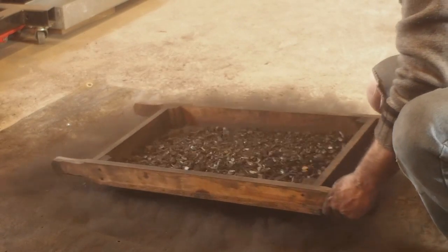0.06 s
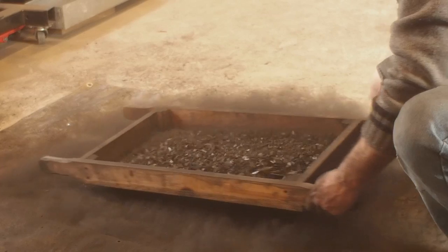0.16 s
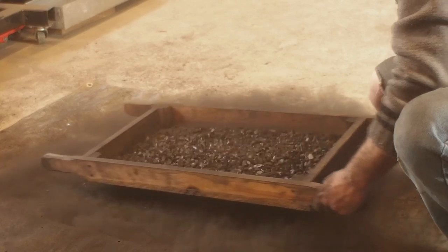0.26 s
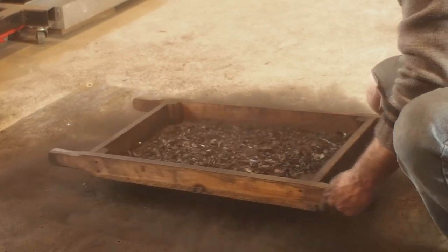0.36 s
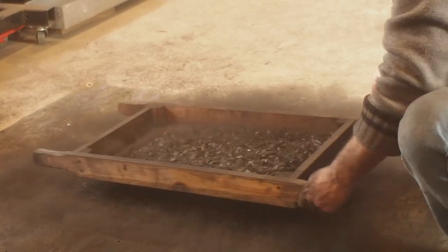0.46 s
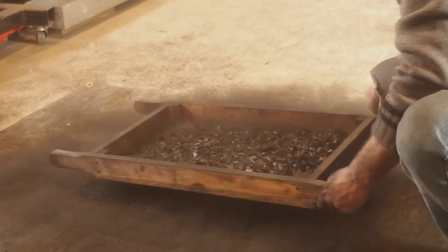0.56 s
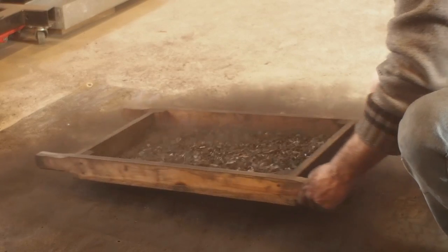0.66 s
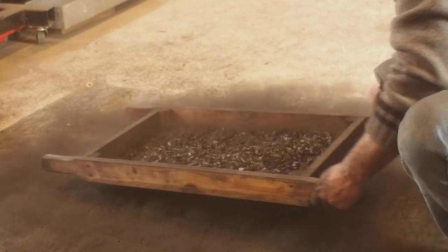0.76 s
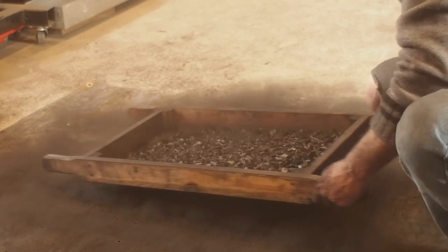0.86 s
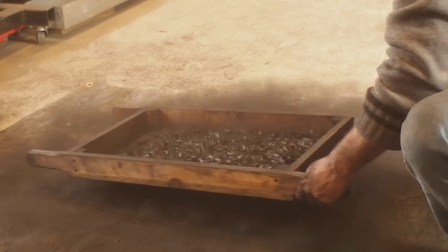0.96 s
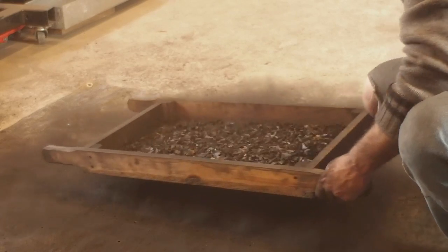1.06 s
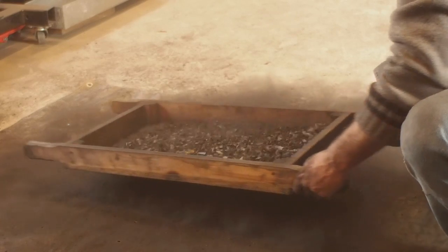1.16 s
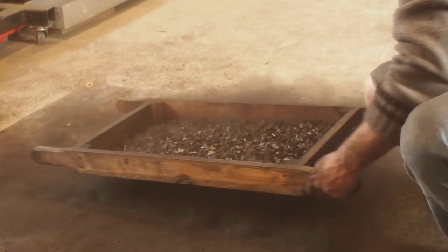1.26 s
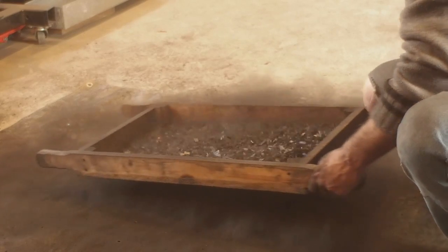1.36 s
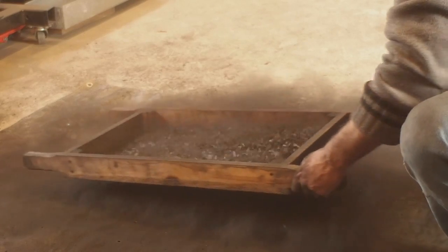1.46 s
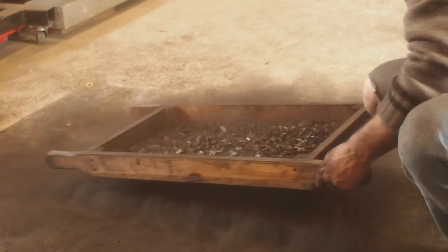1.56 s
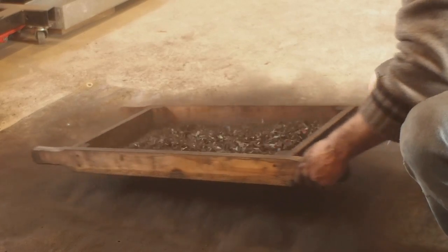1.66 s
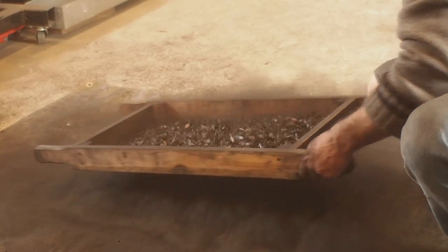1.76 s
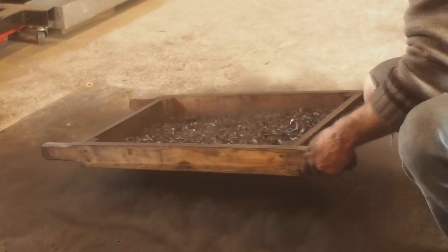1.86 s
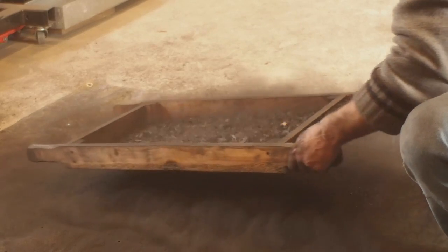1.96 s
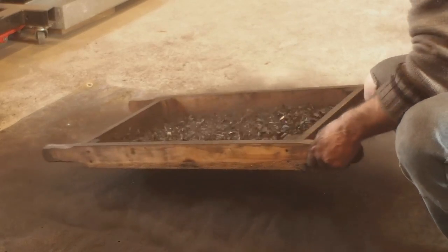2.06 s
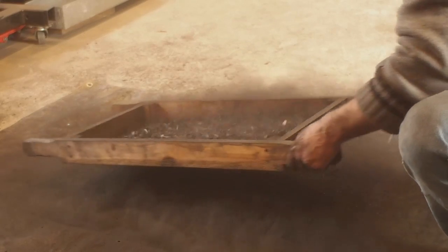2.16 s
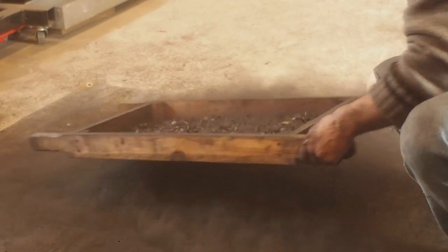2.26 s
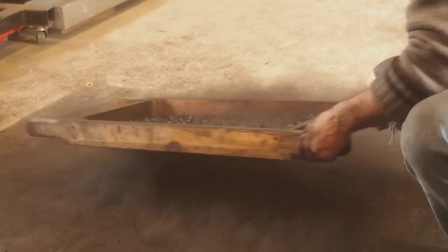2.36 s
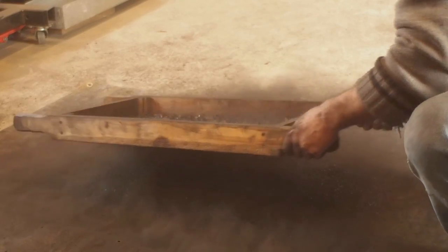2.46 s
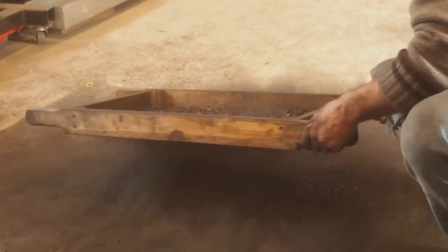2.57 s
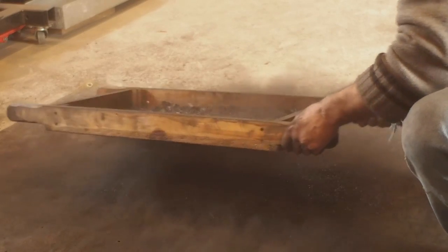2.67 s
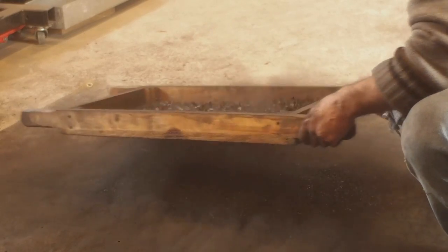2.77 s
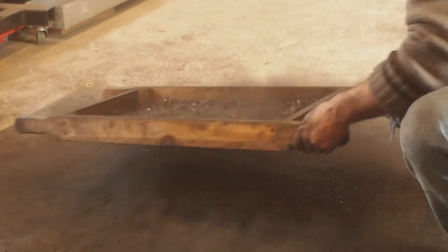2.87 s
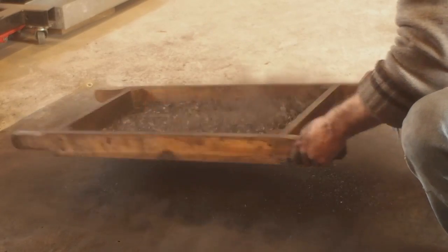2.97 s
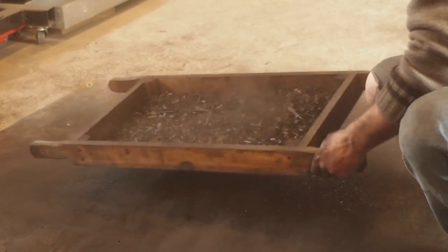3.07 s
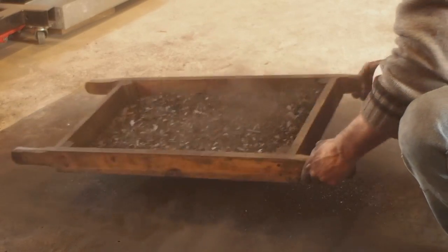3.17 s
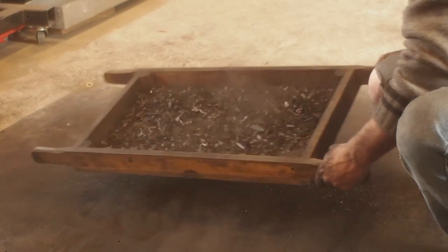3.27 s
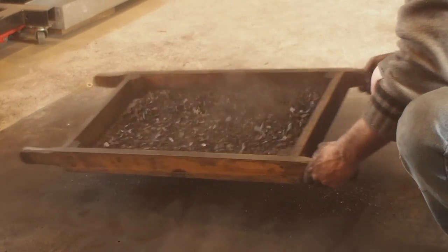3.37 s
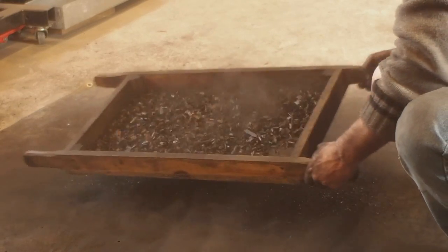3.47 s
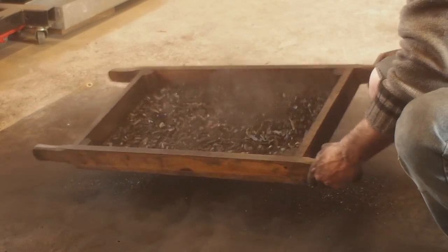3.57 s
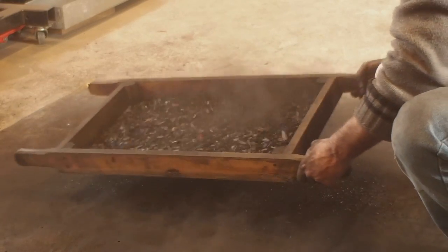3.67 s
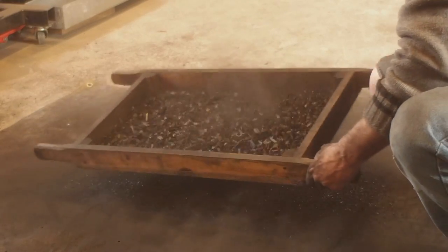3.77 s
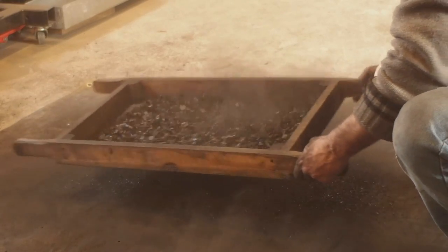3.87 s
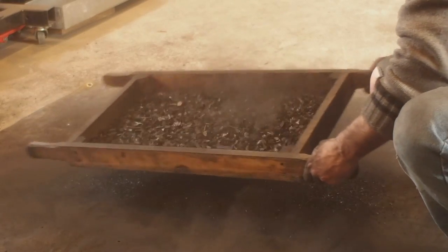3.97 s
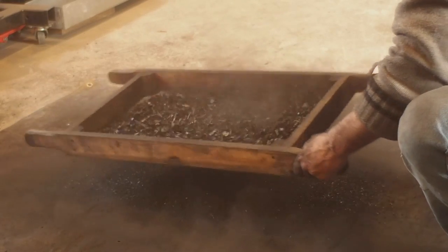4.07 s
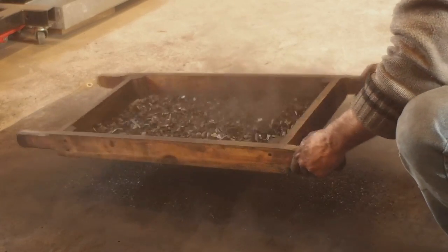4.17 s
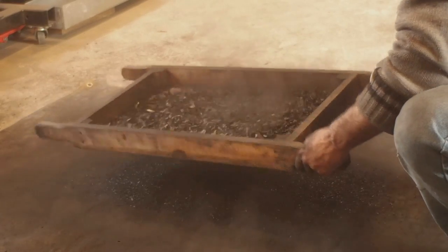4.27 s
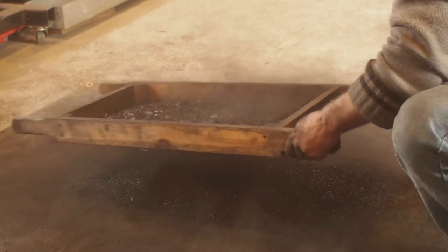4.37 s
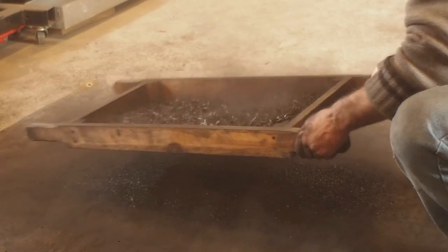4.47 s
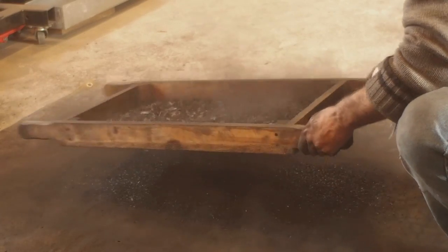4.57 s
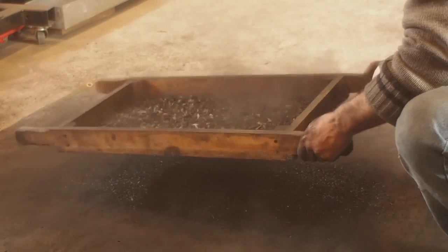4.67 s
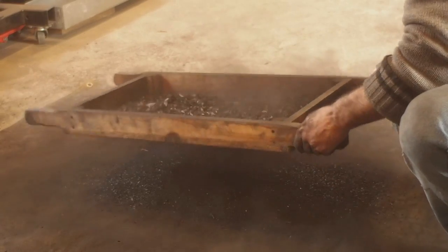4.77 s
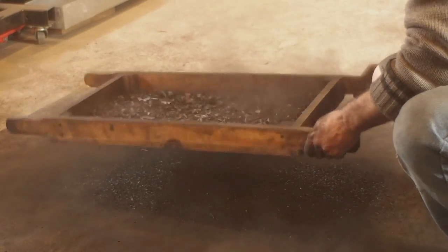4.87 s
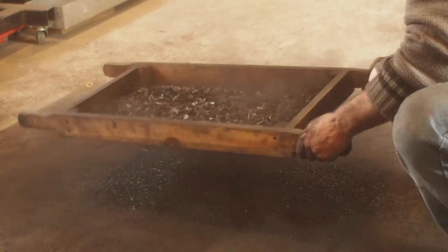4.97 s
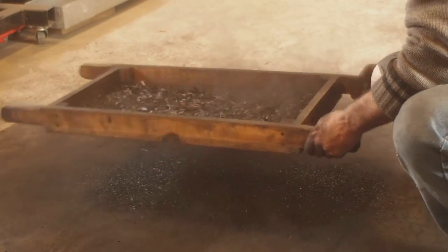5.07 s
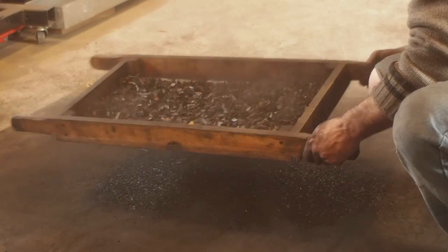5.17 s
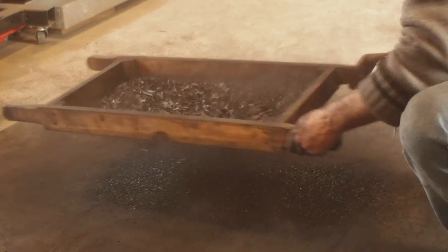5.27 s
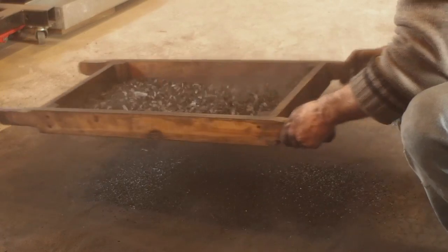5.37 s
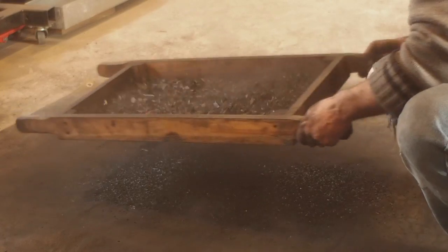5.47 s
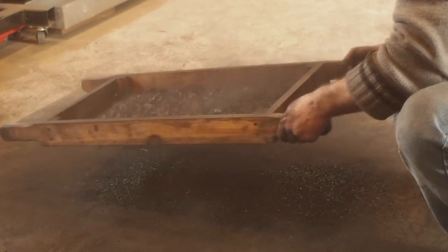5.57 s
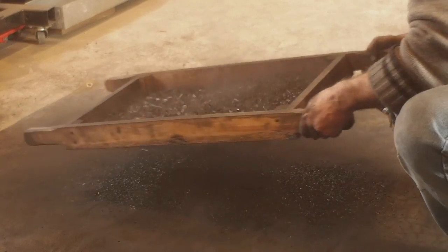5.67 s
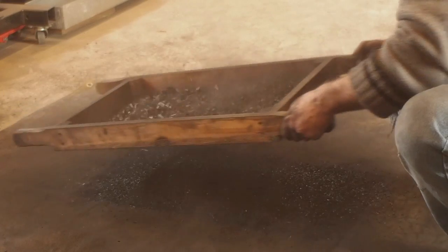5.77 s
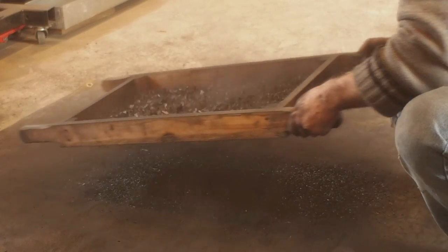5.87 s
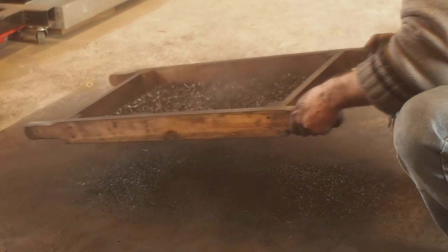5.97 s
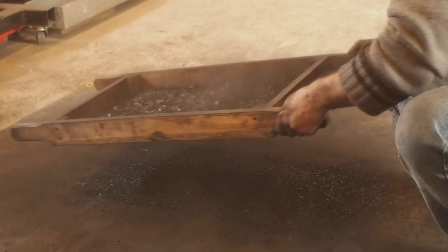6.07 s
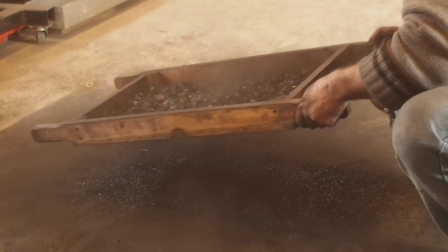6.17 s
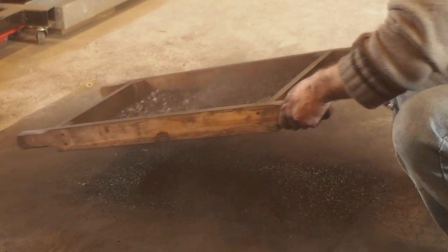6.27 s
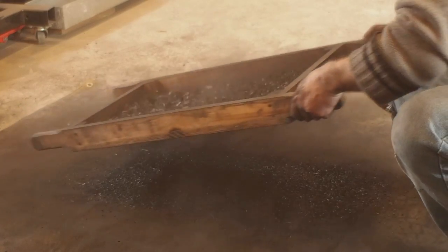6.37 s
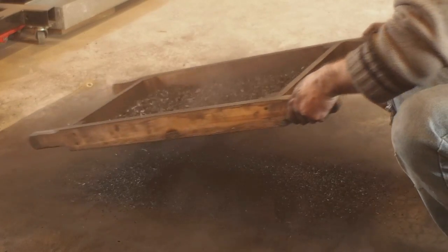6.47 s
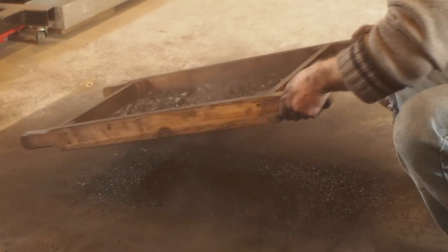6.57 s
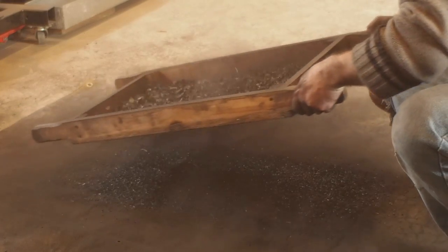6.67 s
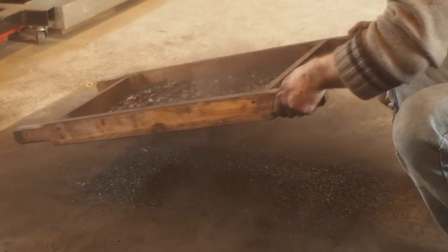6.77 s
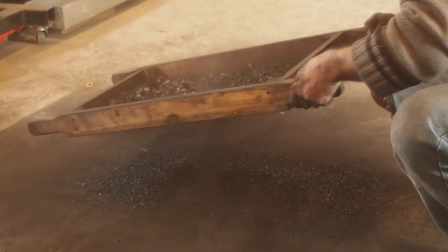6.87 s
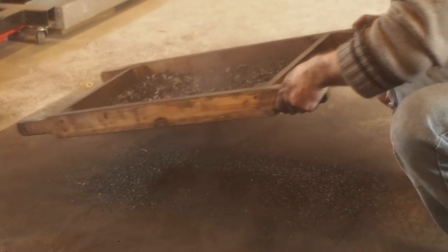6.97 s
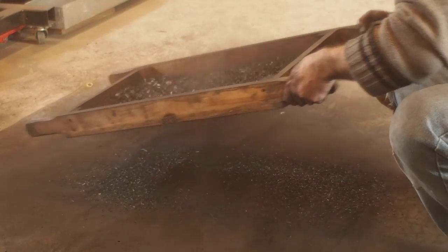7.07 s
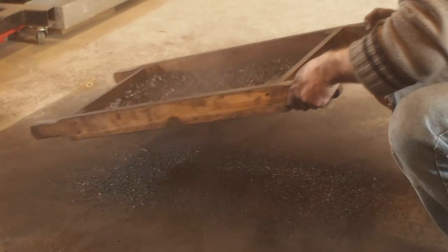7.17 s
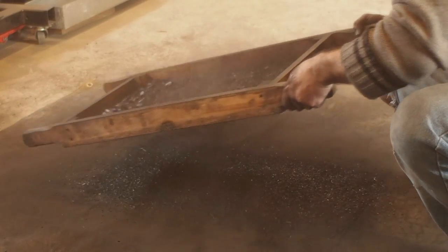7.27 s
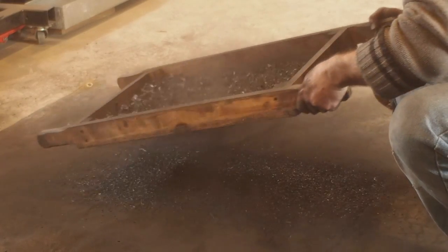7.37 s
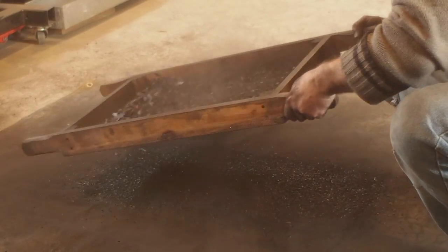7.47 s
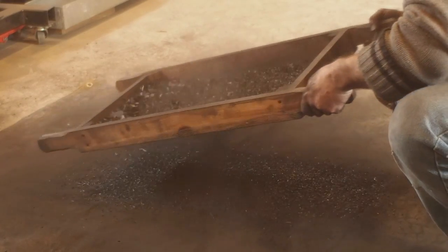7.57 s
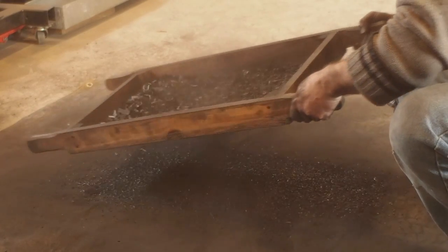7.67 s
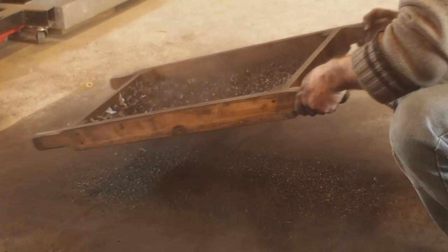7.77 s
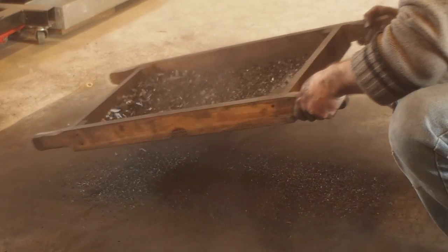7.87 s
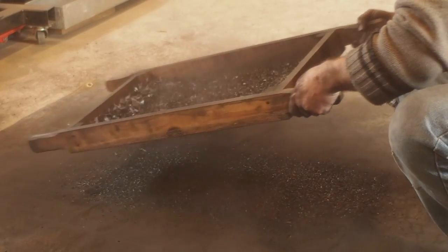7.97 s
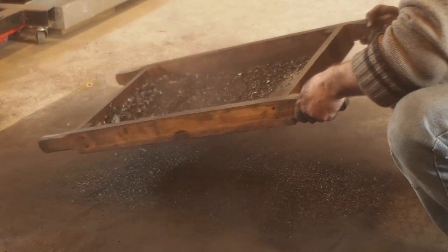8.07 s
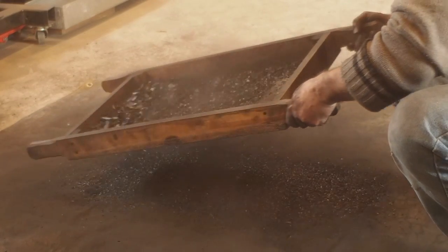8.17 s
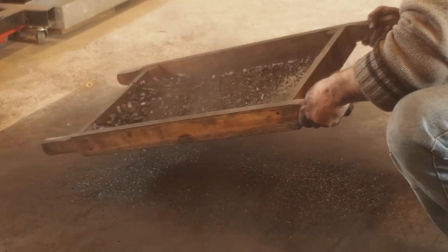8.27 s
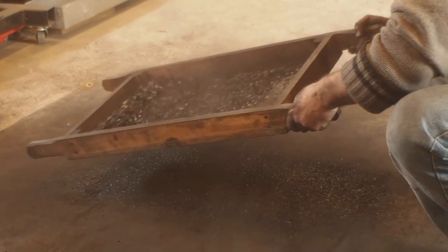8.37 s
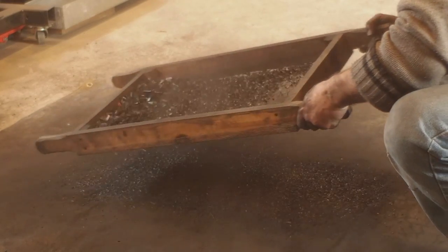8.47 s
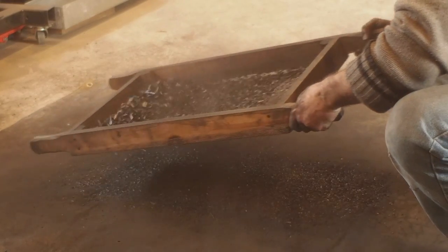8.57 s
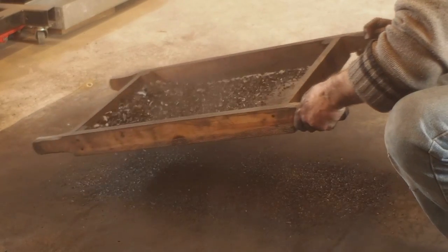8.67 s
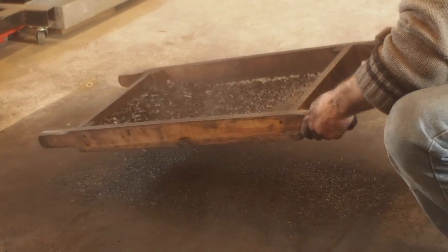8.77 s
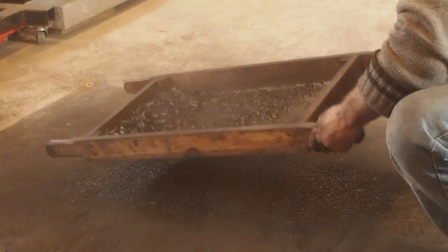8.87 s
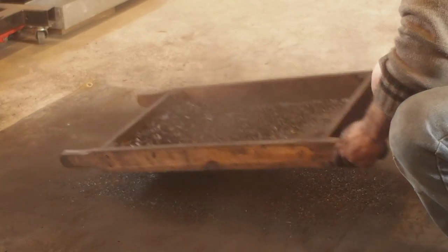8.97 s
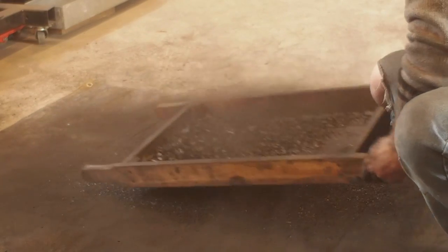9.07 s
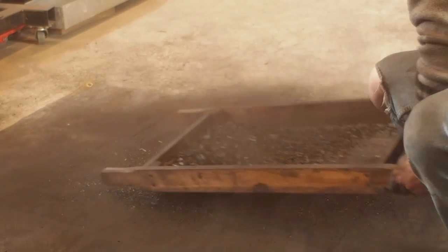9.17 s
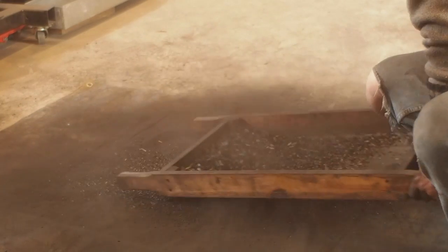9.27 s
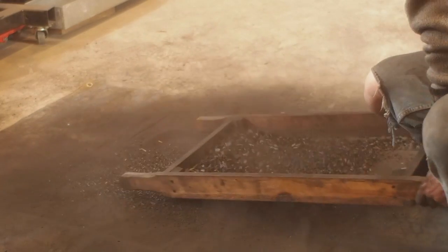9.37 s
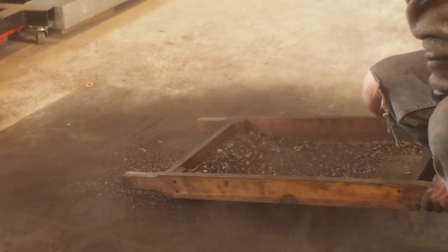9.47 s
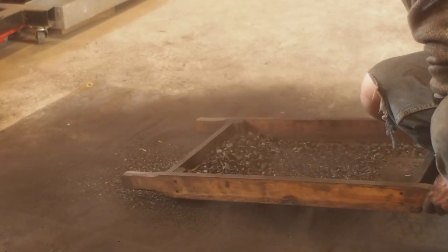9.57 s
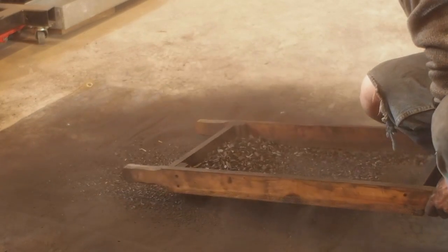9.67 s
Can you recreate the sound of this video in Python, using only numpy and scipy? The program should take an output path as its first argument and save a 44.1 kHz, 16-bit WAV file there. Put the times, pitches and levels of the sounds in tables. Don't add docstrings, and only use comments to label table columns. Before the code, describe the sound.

A steady, quick shuffle of dry charcoal in a sieve: swish, tiny pause, swish back, with crisp small clinks, snaps and a grainy hiss, plus woody frame rattle. The later strokes are uneven, strong on the return, and gradually weaken. Then it stops; sparse ticks, a light wooden set-down and a short gritty drag follow. Close microphone, slight diffuse shed echo, rather soft top treble, quiet machinery hum and distant rumble behind.

```python
import sys
import numpy as np
from scipy import signal
from scipy.fft import rfft, irfft, next_fast_len
from scipy.io import wavfile
from scipy.ndimage import uniform_filter1d

SR = 44100
rng = np.random.default_rng(int(sys.argv[2]) if len(sys.argv) > 2 else 0)


def to_wav(sig):
    pcm = np.clip(np.atleast_2d(sig), -1, 1) * 32767
    pcm = np.round(pcm).astype(np.int16)
    wavfile.write(sys.argv[1], SR, pcm.T)


def voltage_ratio(decibels):
    exponent = np.asarray(decibels, float) / 20
    return 10 ** exponent


N = 429093


def evened(x):
    return x / np.sqrt(np.mean(x ** 2) + 1e-20)


def read(points, hz):
    f, value = np.transpose(points)
    return np.interp(np.log(hz + 1), np.log(f + 1), value)


def curve(s, value):
    return uniform_filter1d(np.interp(np.arange(N) / SR, s, value), size=700)


def band(x, lo_hz, hi_hz):
    return signal.sosfilt(signal.butter(2, [lo_hz, hi_hz], "bandpass", fs=SR, output="sos"), x)


def level_in_band(x, level_db, ref_hz):
    return x / np.sqrt(np.mean((band(x, *ref_hz) / voltage_ratio(level_db)) ** 2))


def swells(rows, rise_db_per_s, fall_db_per_s):
    t = np.arange(0, N + 64, 64) / SR
    power = 0
    for s, db, hold in rows:
        early = np.maximum(s - t, 0)
        late = np.maximum(t - s - abs(hold), 0)
        power = power + voltage_ratio(2 * (db - rise_db_per_s * early - fall_db_per_s * late))
    return np.interp(np.arange(N) / SR, t, power)


def pair(shape, same):
    a, b, c, d = rng.standard_normal((shape[1], shape[0], 4)).T
    same, left = np.clip(same, -1, 1)[:, None], a + 1j * b
    right = same * left + np.sqrt(1 - same ** 2) * (c + 1j * d)
    return np.array([left, right]) / np.sqrt(2)


def clink(hz, cycles, lead_s=0., glide=0.):
    t = np.maximum(np.arange(1024) / SR - .0003 + np.array([[lead_s], [-lead_s]]) / 2, 0)
    turns = hz * t * (1 + glide * np.minimum(hz * t / cycles, 2))
    return np.sin(2 * np.pi * turns) * np.exp(-hz * t / cycles) * (1 - np.exp(-hz * t * 2))


def knocks(level_db, per_s, spread_db, share):
    busy = voltage_ratio(2 * share * (level_db - level_db.max()))
    hit = rng.random(N) < per_s * busy / SR
    size = voltage_ratio(spread_db * np.minimum(rng.exponential(1, N), 5)) * rng.choice([-1, 1], N)
    return hit * size * voltage_ratio(level_db) / np.sqrt(busy)


def pieces(level_db, lean, pitches, cycles, per_s, spread_db, share, wide_s, clump_db, ref_hz, count):
    hits, kind = knocks(level_db, per_s, spread_db, share), rng.integers(0, count, N)
    s, lean_points, slide_points = np.transpose(lean)
    lean_db = np.interp(np.arange(N) / SR, s, lean_points)
    slide = np.interp(np.arange(N) / SR, s, slide_points)
    clumps = rng.standard_normal((N // 512 + 1, count))
    clumps = evened(uniform_filter1d(uniform_filter1d(clumps, 6, axis=0), 5, axis=1))
    hits = hits * voltage_ratio(clump_db * clumps[np.arange(N) // 512, kind])
    middle_hz, out = np.sqrt(ref_hz[0] * ref_hz[1]), np.zeros((2, N))
    for k, hz in enumerate(np.geomspace(pitches[0][0], pitches[-1][0], count)):
        ring, glide = rng.standard_normal(2)
        place = 2 * (k * .618 % 1) - 1
        shape = clink(hz, cycles * np.exp(0.25 * ring), place * min(wide_s, 0.43 / hz), 0.031 * glide)
        gain = np.sqrt(hz) / np.linalg.norm(shape[0])
        at, these = np.flatnonzero((kind == k) & (hits != 0)), np.zeros(N)
        size_db = lean_db[at] * np.log2(hz / middle_hz)
        these[at] = hits[at] * voltage_ratio(size_db + read(pitches, hz / 2 ** slide[at]))
        out += signal.oaconvolve(these[None], gain * shape, axes=1)[:, :N]
    return level_in_band(out, level_db, ref_hz)


def ringing(level_db, modes, per_s, spread_db, ref_hz):
    t, out = np.arange(4096) / SR, np.zeros(N)
    for hz, width, db in modes:
        mode = voltage_ratio(db) * np.sqrt(width) * np.sin(2 * np.pi * hz * t) * np.exp(-np.pi * width * t)
        out += signal.oaconvolve(knocks(level_db, per_s, spread_db, .3), mode)[:N]
    return level_in_band(out, level_db, ref_hz)


def singles(rows, cycles, bounce_db, crack_db):
    out = np.zeros((2, N + SR))
    for s, db, hz in rows:
        for k, (late, tune, place) in enumerate(rng.random((4, 3))):
            at = round((s - .0003 + k * 0.0058 * (.5 + late)) * SR)
            pitch = hz * (1 + (k > 0) * (tune - .4))
            crack = clink(5200, 0.61)
            ring = clink(pitch, cycles, 4e-5 * (place - .5))
            out[:, at:at + 1024] += voltage_ratio(db + k * bounce_db) * (ring + voltage_ratio(crack_db) * crack)
    return out[:, :N]


# near_turn_s,
# pause_db, out_stroke_db, far_turn_s, back_stroke_db
SIEVE_STROKES = [(.05, 8, -43, .17, -42), (.3, 8, -40, .44, -41), (.55, 8, -41, .66, -39.5),
                 (.79, 8, -39.5, .91, -40), (1.04, 7.5, -39, 1.16, -38.5), (1.3, 8, -39, 1.42, -38.5),
                 (1.55, 8, -39.5, 1.68, -39), (1.81, 5.5, -41, 1.91, -38), (2.05, 4.5, -40.5, 2.16, -38),
                 (2.29, 6, -38.5, 2.41, -39), (2.53, 7, -38.5, 2.66, -40), (2.78, 7, -38.5, 2.9, -39),
                 (3.03, 4, -41, 3.14, -38), (3.27, 5.5, -39, 3.38, -38), (3.52, 3, -39, 3.62, -38),
                 (3.75, 5, -39.5, 3.86, -38), (3.99, 6, -38, 4.1, -38.5), (4.24, 8, -38, 4.36, -38),
                 (4.48, 6, -38.5, 4.62, -41), (4.71, 7, -39, 4.85, -41), (4.95, 5, -41, 5.08, -41),
                 (5.18, 5, -39, 5.3, -36), (5.43, 4, -37, 5.54, -36.5), (5.67, 5, -37.5, 5.77, -37),
                  (5.92, 5.5, -38, 6.01, -36.5), (6.16, 5.5, -39, 6.25, -37.5), (6.4, 4, -41, 6.5, -38),
                  (6.64, 4, -41, 6.73, -38), (6.88, 4, -41, 6.97, -38), (7.11, 5.5, -40, 7.2, -38),
                  (7.34, 5.5, -41, 7.43, -39), (7.58, 5, -43, 7.66, -39), (7.8, 5, -42, 7.89, -40),
                  (8.04, 3.5, -45.5, 8.12, -41), (8.25, 4, -43, 8.34, -42), (8.47, 4, -46, 8.56, -44)]
# start_s, fines_over_lumps_db, far_turn_pause_db
LOAD_BALANCE = [(0, 1.5, 4.5), (.6, 0, 2.5), (1.4, 1, 7), (2.6, -0.4, 2.5), (3.14, 2.5, 7.5), (3.5, 3, 3.5),
                (4.3, 0.8, 2.5), (5.05, 6, 5.5), (5.4, 3.5, 4), (6, 1.2, 5), (7, 0.53, 5), (8.7, 2.5, 8.5)]
# start_s, level_db, fines_over_lumps_db, hold_s
LOAD_SLIDES = [
    (8.713, -50, 3, 0.0072),
    (8.92, -62.5, 3, 0.053),
    (9.048, -68.5, 3, 0),
    (9.09, -63.5, -4, .015),
    (9.228, -55.5, -1.5, 0.018),
    (9.335, -50.5, 9.5, 0.038),
    (9.392, -57, -2.5, 0.17),
    (9.624, -64, -3, 0.073),
    (9.73, -59, 3.5, 0),
]


def shaking(fines):
    opening_db, stop_s, stop_db = -43, 8.68, -53
    out_peak, back_peak, lumps_lead = .57, 0.47, 0.07
    deep = (1.2, 0.84)[fines]
    back_lumps_db = 0.51
    side = fines - .5
    near, pause_db, out_db, far, back_db = np.transpose(SIEVE_STROKES)
    s, mix_db, far_pause_db = np.transpose(LOAD_BALANCE)
    before_db, next_near = np.append(opening_db, back_db[:-1]), np.append(near[1:], stop_s)
    out_s = near + (out_peak + side * lumps_lead) * (far - near)
    back_s = far + (back_peak + side * lumps_lead) * (next_near - far)
    near_db = (before_db + out_db) / 2 - deep * pause_db
    far_db = (out_db + back_db) / 2 - deep * np.interp(far, s, far_pause_db)
    times = np.ravel([near, out_s, far, back_s], "F")
    levels = np.ravel([near_db, out_db, far_db, back_db + (1 - fines) * back_lumps_db], "F")
    times = np.concatenate([[0], times, [stop_s, LOAD_SLIDES[0][0]]])
    levels = np.concatenate([[opening_db], levels, [stop_db, -np.inf]])
    strokes = curve(times, voltage_ratio(2 * (levels + side * np.interp(times, s, mix_db))))
    rows = [(at, db + side * over, hold) for at, db, over, hold in LOAD_SLIDES]
    slides = swells(rows, rise_db_per_s=251, fall_db_per_s=180)
    return 10 * np.log10(abs(strokes) + slides + 1e-9)


# start_s, lean_db_per_octave,
# slide_octaves
LUMP_SIZE = [(0, 0.5, 0.18), (.9, -0.5, 0.24), (1.3, 1, 0.078), (2.4, -0.5, -0.018), (4, 1.5, -.03),
             (4.6, 0.5, -0.16), (5.2, 0, -0.37), (5.6, -1.5, -0.024), (7.1, -0.5, -0.084), (8, 2, -.15),
             (8.7, -1.5, -0.12), (9.73, -6, .2)]
# pitch_hz, level_db
LUMP_PITCHES = [(800, -11), (1100, -11), (1280, -1.5), (1700, 0), (2200, -0.5), (2900, -1.5), (3600, -2),
                (4000, -13.5), (5500, -12.5)]


def lumps():
    return pieces(shaking(0) - 2.2, LUMP_SIZE, LUMP_PITCHES, cycles=5.36, per_s=10000, spread_db=1.7, share=.3,
                  wide_s=5.5e-5, clump_db=1.47, ref_hz=(1000, 4000), count=44)


# pitch_hz, width_hz, level_db
MESH_MODES = [(1035, 25, -5), (1295, 28, 2), (1549, 43, 1), (1900, 60, 2), (2395, 63, 2.5), (2824, 110, 4),
              (3400, 130, -2.5)]


def mesh():
    return ringing(shaking(0) - 8, MESH_MODES, per_s=500, spread_db=2.3, ref_hz=(1000, 4000))


# start_s, lean_db_per_octave, slide_octaves
DUST_SHARE = [(0, -1.5, 0), (1.5, 0.5, 0), (4.5, -1.5, 0), (5.4, -2, 0), (6.5, 0.5, 0), (8.6, 1, 0),
              (9.73, -2.5, 0)]
# pitch_hz, level_db
FINE_PITCHES = [(2400, -9), (3200, -7.5), (4200, -2.5), (5500, -5), (7000, -1.5), (9000, -2), (11000, -1),
                (14000, -0.5)]


def fines():
    return pieces(shaking(1) + 1.26, DUST_SHARE, FINE_PITCHES, cycles=2.68, per_s=42000, spread_db=1, share=.12,
                  wide_s=5.5e-5, clump_db=0.72, ref_hz=(4000, 12000), count=40)


# pitch_hz, level_db
SNAP_PITCHES = [(2500, 6), (6000, -5)]


def snaps():
    return pieces(shaking(0) - 10, DUST_SHARE, SNAP_PITCHES, cycles=0.64, per_s=700, spread_db=2.9, share=.33,
                  wide_s=3e-5, clump_db=2, ref_hz=(2000, 8000), count=8)


# pitch_hz, width_hz, level_db
WOOD_MODES = [(333, 53, -9), (442, 19, 0), (479, 53, -5), (634, 20, -2.5), (687, 45, 0.5), (833, 34, -5)]
# start_s, level_db
GRIP_RATTLE = [(0, -57.5), (2, -59), (2.6, -59), (5, -60.5), (5.6, -58.5), (6.8, -60), (7.2, -59.5),
               (9.73, -60.5)]
# start_s, level_db
BOARD_BLOWS = [(.01, -53), (.24, -59), (.38, -50.5), (.51, -55.5), (.62, -58), (.88, -53.5), (1.14, -57.5),
               (1.38, -54), (1.51, -55), (1.6, -55), (1.72, -56), (2.2, -52.5), (2.35, -55), (2.6, -59),
               (2.74, -58.5), (3.22, -57.5), (3.68, -60), (3.95, -55), (4.04, -59), (5.36, -56),
               (5.85, -57), (6.12, -54), (7.07, -55.5), (7.29, -54), (7.48, -58), (7.72, -57.5),
               (7.94, -62), (8.18, -54), (8.4, -56), (8.62, -59)]
# start_s, level_db, hold_s
GROUND_KNOCKS = [
    (9.223, -55.5, 0.021),
    (9.313, -61.5, 0.069),
    (9.42, -68, 0.28),
]


def frame():
    follow, rest_db = 0.73, -78
    rattle_db = curve(*np.transpose(GRIP_RATTLE)) + follow * (shaking(0) + 40)
    rattle = voltage_ratio(2 * rattle_db) + voltage_ratio(2 * rest_db)
    rows = [(s, db, 0) for s, db in BOARD_BLOWS] + GROUND_KNOCKS
    blows = swells(rows, rise_db_per_s=250, fall_db_per_s=280)
    return ringing(10 * np.log10(rattle + blows), WOOD_MODES, per_s=400, spread_db=2.46, ref_hz=(380, 900))


# pitch_hz, t60_s
ECHO_TIME = [(200, 0.54), (1500, 0.31), (5000, 0.057), (12000, 0.26)]
# pitch_hz, likeness
ECHO_LIKENESS = [(200, 0.2), (1400, 0.54), (3000, 0.078), (7000, 0.07)]


def room(x):
    hz, t, z = signal.stft(x.mean(0), SR, nperseg=256, noverlap=192)
    keep = voltage_ratio(-2 * 60 * t[1] / read(ECHO_TIME, hz))
    power = np.array([signal.lfilter([0, 0, 1 - k], [1, -k], abs(row) ** 2) for k, row in zip(keep, z)])
    echo = np.sqrt(power) * pair(z.shape, read(ECHO_LIKENESS, hz))
    return 2 * signal.istft(echo, nperseg=256, noverlap=192)[1][:, :N]


# pitch_hz, level_db per Hz
SHED_AIR = [(24, -40), (45, -16), (120, -13), (300, 1.5), (470, -1), (720, -6.5), (1100, -5), (2200, -7.5),
            (4500, -9), (7500, -16), (11000, -16), (15500, -12.5)]
# pitch_hz, likeness
SHED_LIKENESS = [(60, 0.66), (240, -0.079), (950, 0.4), (3770, -0.28), (15000, 0.12)]
# start_s, level_db
RUMBLE_LEVEL = [(0, -80), (4.1, -77), (4.75, -84), (5.1, -78), (7.1, -71.5), (9.73, -73.5)]
# start_s, level_db
RUMBLE_SURGES = [(4.99, -72), (7.21, -69.5), (8.26, -71), (9.73, -72)]


def shed():
    frames, hz = N // 512 + 5, np.fft.rfftfreq(2048, 1 / SR)
    patches = rng.standard_normal((frames, 1025)).T
    patches = evened(uniform_filter1d(uniform_filter1d(patches, 6, axis=0), 8, axis=1))
    z = pair(patches.shape, read(SHED_LIKENESS, hz)) * voltage_ratio(read(SHED_AIR, hz)[:, None] + 0.81 * patches)
    air = voltage_ratio(-56) * evened(signal.istft(z, nperseg=2048, noverlap=1536)[1][:, :N])
    low = rng.standard_normal((3, N))
    low = low[0] + 0.46 * low[1:]
    low = evened(band(band(band(low, 55, 118), 55, 124), 50, 144))
    surges = swells([(s, db, 0) for s, db in RUMBLE_SURGES], rise_db_per_s=50, fall_db_per_s=38)
    rumble = np.sqrt(voltage_ratio(2 * curve(*np.transpose(RUMBLE_LEVEL))) + surges) * low
    return air + voltage_ratio(3) * rumble


# start_s, level_db
DRONE_LEVEL = [(0, -65.5), (1.3, -65.5), (1.76, -63.5), (1.9, -69), (2.55, -65.5), (2.65, -65), (9.3, -65),
               (9.73, -64.5)]
# pitch_hz, width_hz, level_db
DRONE_RINGS = [(185, 30, -9.5), (201, 20, -0.5), (225.5, 16, 0.5), (264, 42, -5)]


def drone():
    level_db = np.interp(np.arange(N) / SR, *np.transpose(DRONE_LEVEL)) + 1.5
    middle, left, right = (ringing(level_db, DRONE_RINGS, 3000, 1.1, (160, 270)) for _ in range(3))
    return 1.21 * middle + .5 * np.array([left, right])


# start_s, peak_db, pitch_hz
FRAME_BUMPS = [
    (1.095, -48, 200),
    (2.595, -46, 190),
    (9.226, -42, 400),
    (9.236, -48, 600),
    (9.24, -46, 1040),
]


def bumps():
    return singles(FRAME_BUMPS, cycles=2.1, bounce_db=-12, crack_db=-30)


# start_s, peak_db, pitch_hz
LAST_TICKS = [(8.9095, -43, 4850), (8.9295, -46, 4580), (8.9695, -39, 2270), (9.0412, -40, 3800),
              (9.0826, -41, 2160), (9.1822, -45, 7660), (9.224, -38, 3500), (9.3248, -39, 3590),
              (9.382, -41, 2000), (9.4333, -39, 2050), (9.4435, -39, 5400), (9.4865, -41, 3540),
              (9.5055, -36, 3200), (9.545, -40, 3000), (9.666, -44, 2480)]


def ticks():
    return voltage_ratio(1) * singles(LAST_TICKS, cycles=2.2, bounce_db=-3.5, crack_db=7.4)


# start_s, level_db, pitch_hz
GROUND_DRAG = [
    (9.36, -85, 2000),
    (9.385, -51, 2000),
    (9.42, -56, 1900),
    (9.5, -60, 1750),
    (9.56, -62, 1750),
    (9.6, -82, 1750),
]


def drag():
    s, level_db, hz = np.transpose(GROUND_DRAG)
    turn = np.exp(2j * np.pi * np.cumsum(curve(s, hz)) / SR)
    slips = (rng.random(N) < 1500 / SR) * rng.standard_normal(N)
    r = np.exp(-np.pi * 250 / SR)
    scrape = turn * signal.lfilter([1 - r], [1, -r], slips / turn)
    return voltage_ratio(curve(s, level_db)) * evened(scrape.real)


def scene():
    small = band(lumps() + fines() + snaps(), 850, 19000)
    sieve = small + mesh() + voltage_ratio(2) * frame() + bumps() + ticks() + drag()
    return voltage_ratio(-0.23) * sieve + voltage_ratio(-7.5) * room(sieve) + shed() + drone()


def band_limit(x):
    return signal.sosfilt(signal.butter(12, 15620, fs=SR, output="sos"), x)


# pitch_hz, level_db
MIC_COLOUR = [(20, -22), (50, -7.5), (7900, 2), (8400, 0.5), (9500, -4), (11000, -13), (13000, -22.5),
              (15500, -22)]
# pitch_hz, level_db
LEFT_TILT = [(60, 0.93), (180, -1.7), (400, 0.42), (2400, -0.77), (4500, 1), (9000, -1.1)]


def record(dry):
    size = next_fast_len(N)
    hz = np.fft.rfftfreq(size, 1 / SR)
    dip_db = 7.5 / (1 + ((hz - 8022) / 22) ** 2)
    colour_db = read(MIC_COLOUR, hz) + np.outer([.5, -.5], read(LEFT_TILT, hz)) - dip_db
    coloured = irfft(rfft(dry, size) * voltage_ratio(colour_db), size)[:, :N]
    hiss = voltage_ratio(-74) * band(rng.standard_normal(dry.shape), 6000, 16000)
    return band_limit(coloured + hiss)


dry = scene()
out = record(dry)
to_wav(out)
```